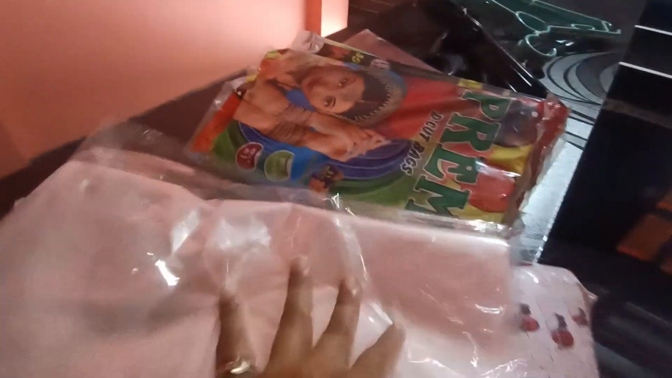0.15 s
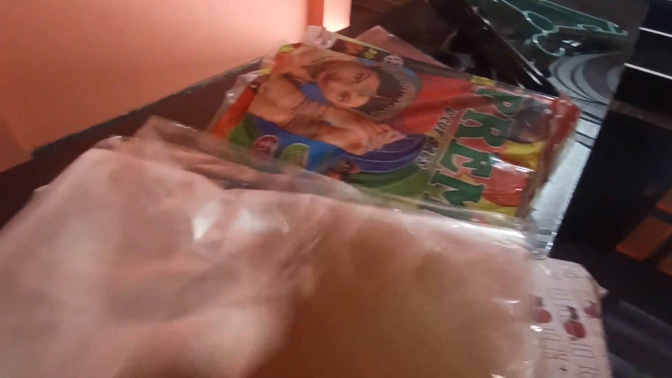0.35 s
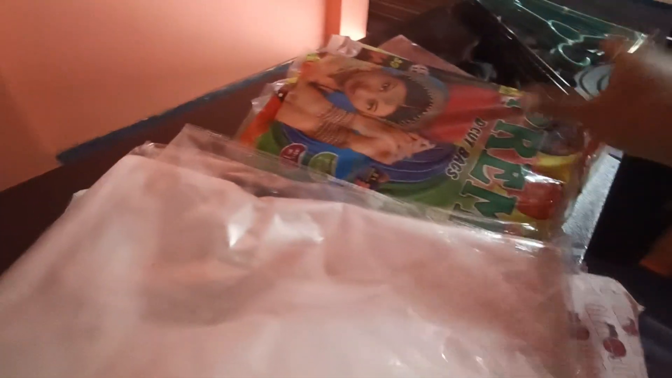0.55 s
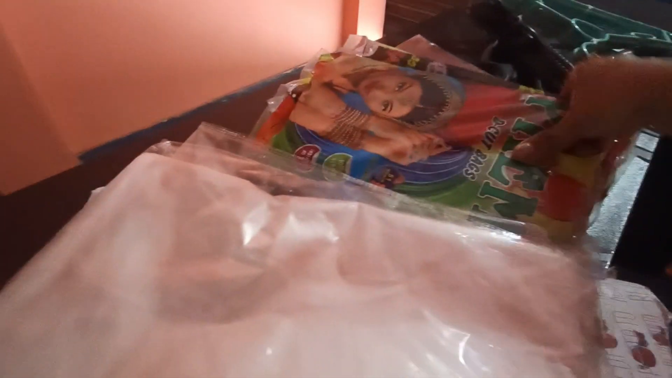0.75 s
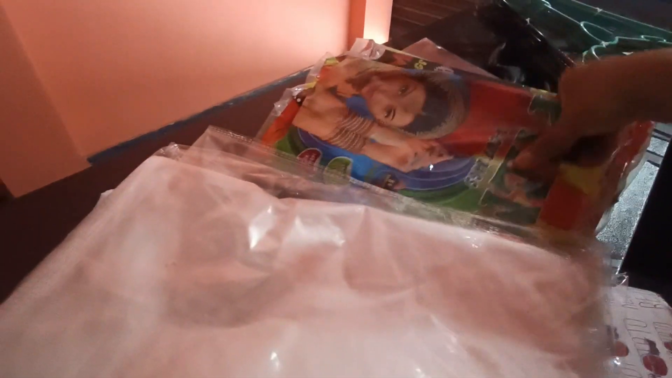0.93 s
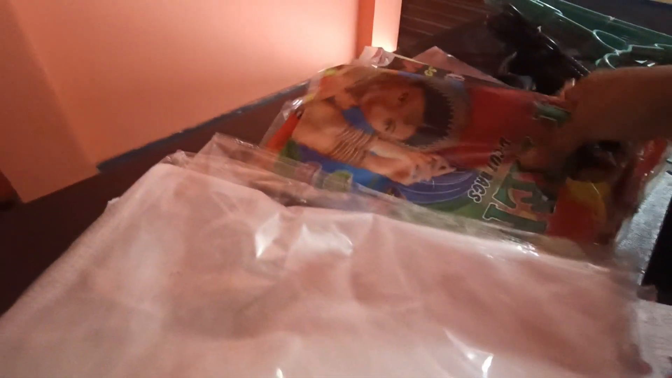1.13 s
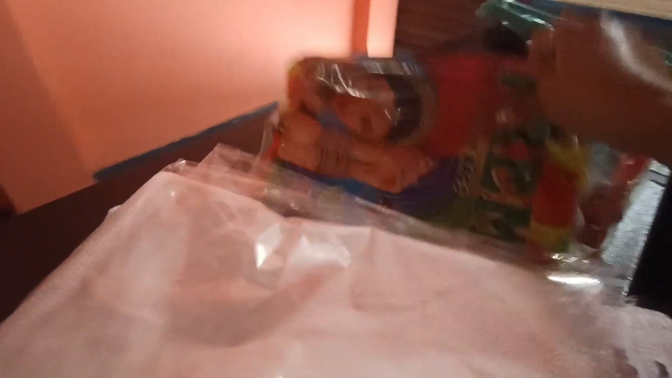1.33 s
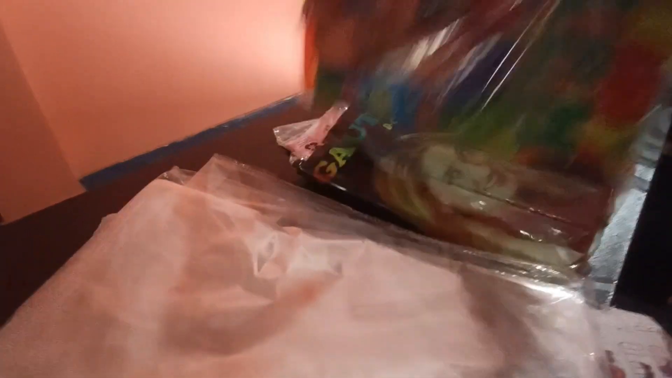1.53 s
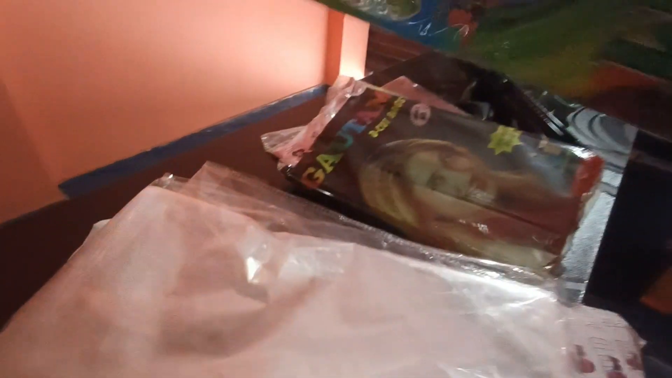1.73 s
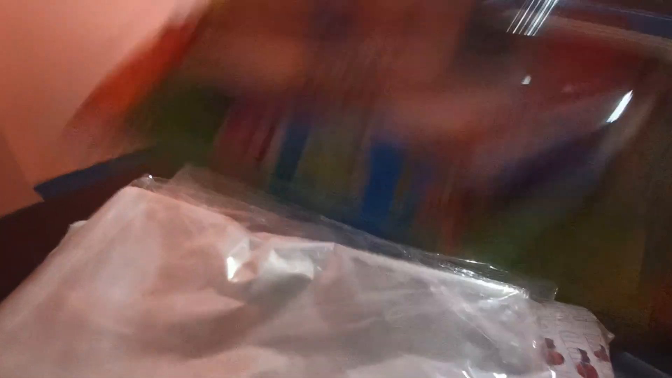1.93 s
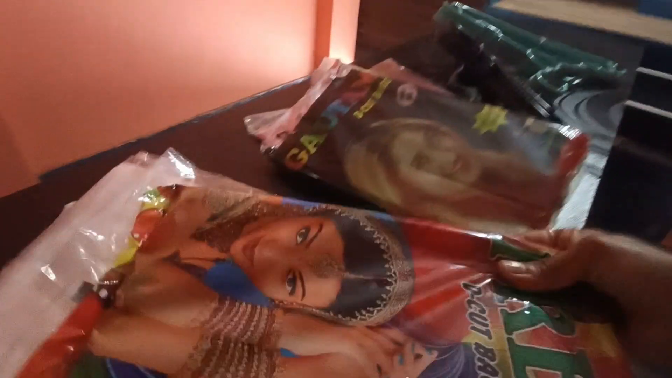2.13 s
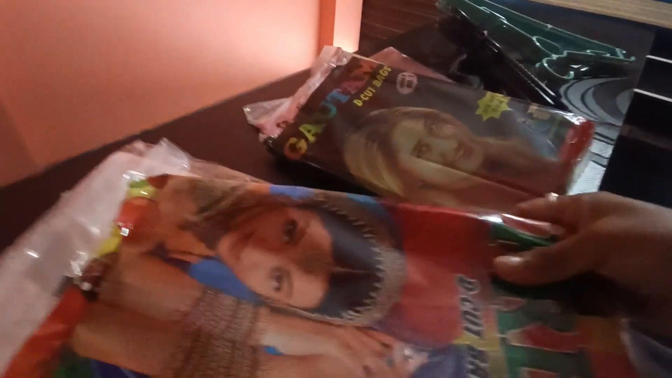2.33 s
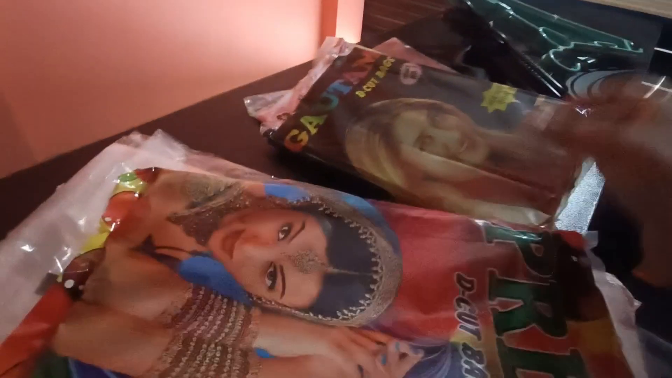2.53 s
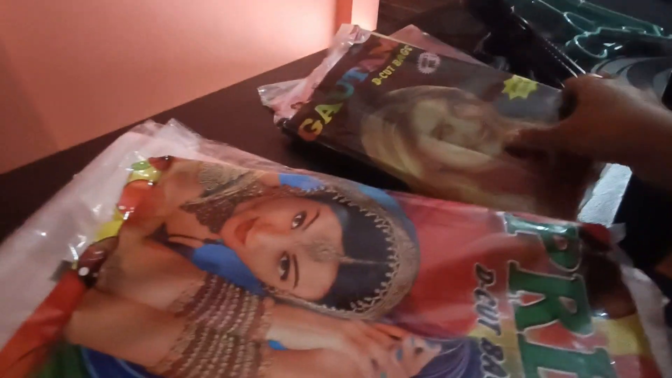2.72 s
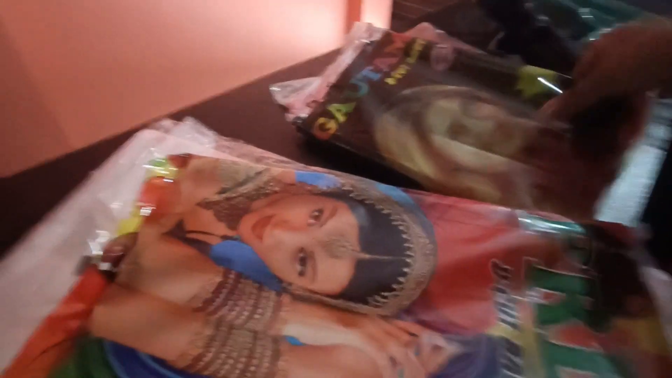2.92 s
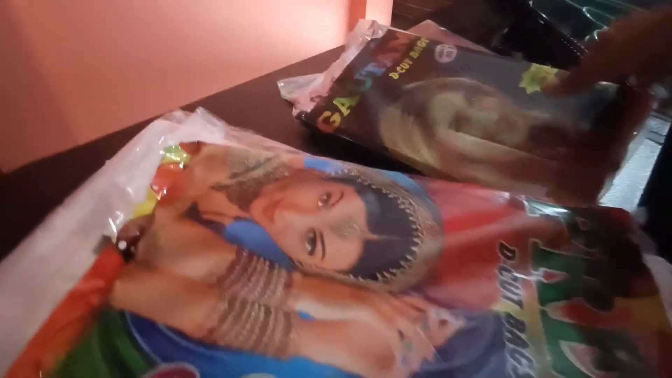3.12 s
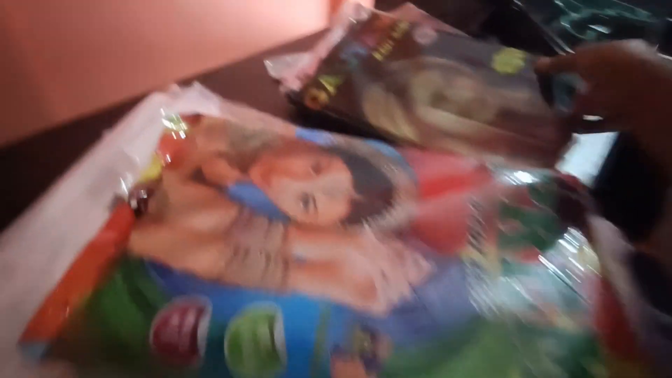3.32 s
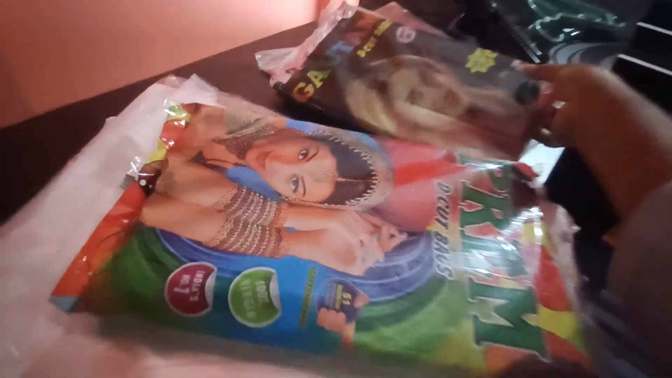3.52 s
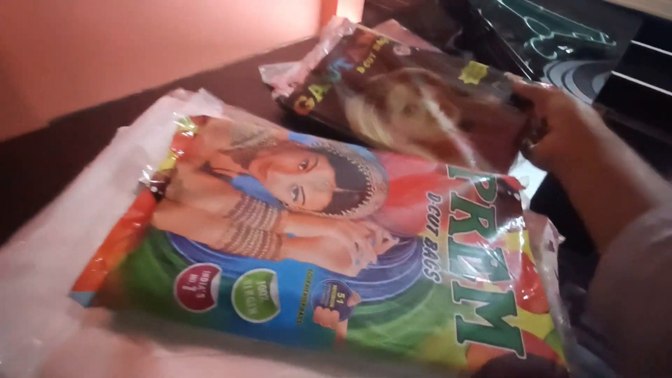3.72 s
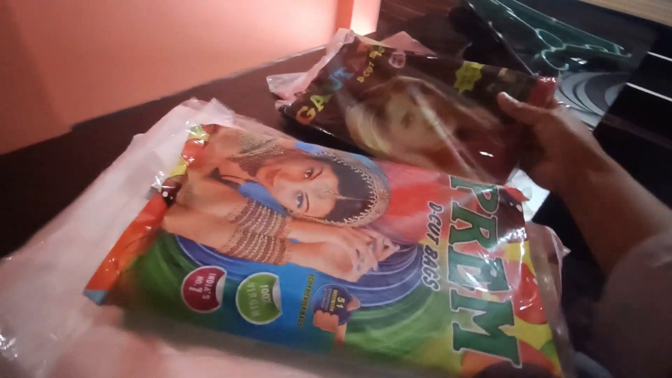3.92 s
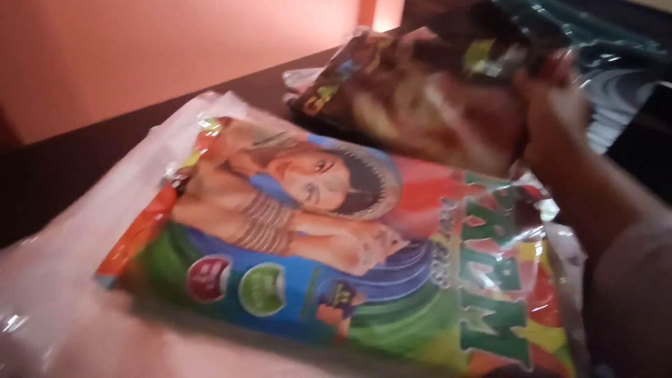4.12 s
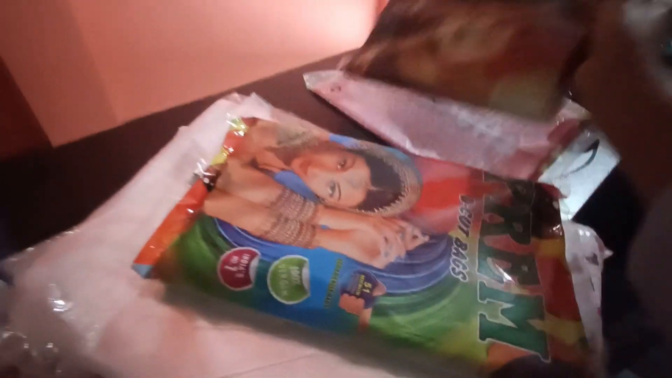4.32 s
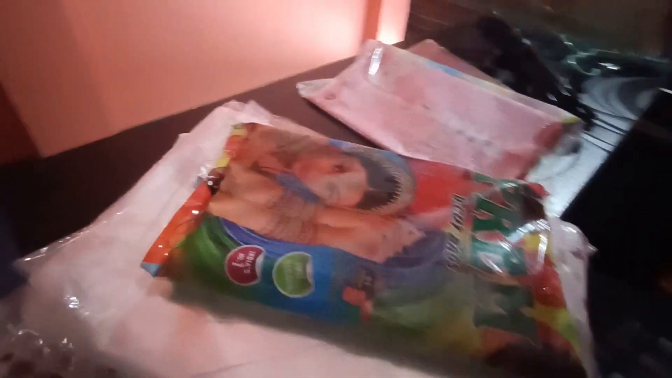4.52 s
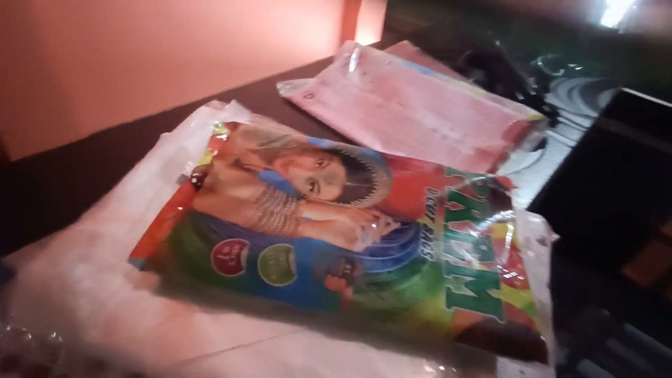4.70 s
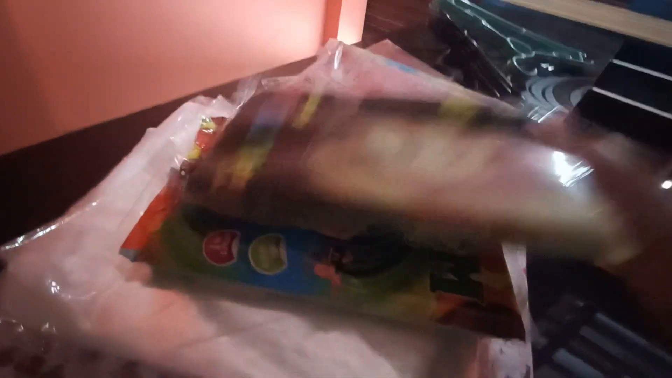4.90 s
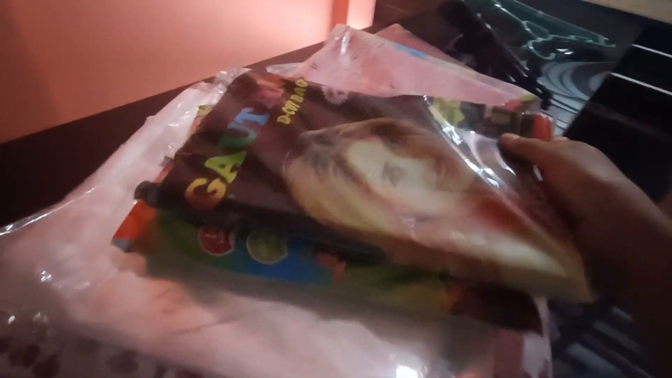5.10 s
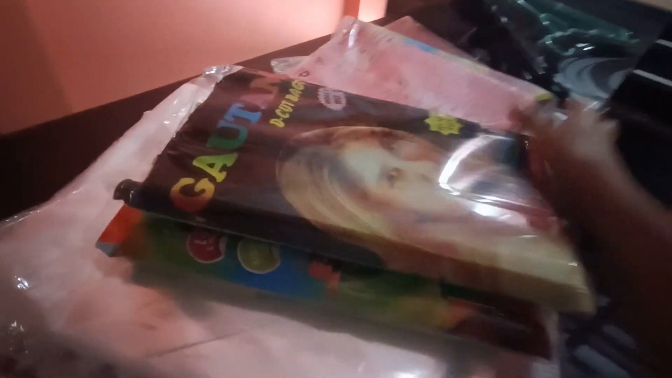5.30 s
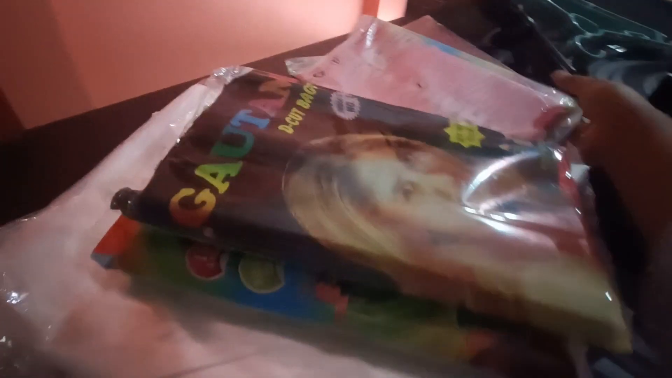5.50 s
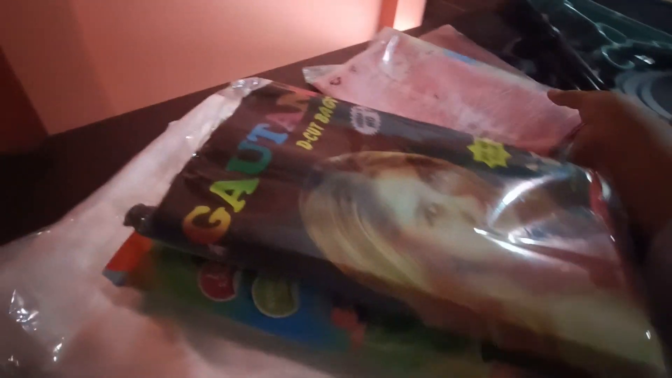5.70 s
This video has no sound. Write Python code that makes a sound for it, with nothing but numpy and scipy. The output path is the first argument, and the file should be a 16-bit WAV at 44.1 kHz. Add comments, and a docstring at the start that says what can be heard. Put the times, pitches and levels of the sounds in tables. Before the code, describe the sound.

Plastic film buckles in countless bright clicks and single ringing snaps as hands pat, grip and lift wrapped packs. One heavy, distorted slap and low thump comes just after two seconds, then lighter crackling, a tap around three seconds, loud cracks past four, and a moderate double landing after five. Hard-walled small room, short bright echo, stereo microphones very near.

```python
"""Stiff film buckling in a bare room

Packs of carry bags in stiff plastic wrap are patted, gripped, lifted and dropped on a table.
The film buckles in countless tiny clicks, made as random decaying noise bursts, and in single ringing snaps,
from faint ticks to loud cracks.
Landing packs slap (dense crackle) and thud (resonant noise and a decaying sine), and push out air.
Decaying noise makes the echo of the room, over a faint hum; two microphones clip on the hardest slaps."""
import sys
import numpy as np
from scipy import signal
from scipy.fft import rfft, irfft, next_fast_len
from scipy.io import wavfile

SR = 44100
rng = np.random.default_rng(int(sys.argv[2]) if len(sys.argv) > 2 else 0)


def store_wav(level_fs):
    """Save 16-bit WAV to argv[1]."""
    pcm = np.round(np.clip(np.atleast_2d(level_fs), -1, 1) * 32767)
    wavfile.write(sys.argv[1], SR, pcm.T.astype(np.int16))


N = 253575

# Levels in the tables are relative within each source, unless stated.
# slow level of the hum: (time [s], level [dB])
HUM_LEVEL = [(0, -44.5), (0.7, -53.5), (2.2, -51), (4.0, -60.5), (5.75, -60)]
# hands or settling packs working the film: (start [s], rise [s], hold [s], effort [dB],
# crispness of the top treble [dB], weight of the sliding stack [dB])
STROKES = [(0.0, 0.00067, 0.031, -23.5, 6, -3.5), (0.213, 0.032, 0.12, -26, 4.5, -3),
           (0.753, 0.011, 0.18, -22.5, -6, -13.5), (0.938, 0.009, 0.011, -20.5, -7, -7),
           (0.992, 0.031, 0.47, -27.5, 6, -7.5), (1.183, 0.093, 0.099, -24.5, -0.5, -4.5),
           (1.364, 0.055, 0.14, -23.5, -2, -0.5), (1.696, 0.042, 0.031, -25.5, -3.5, -6),
           (1.932, 0.044, .01, -33.5, -11, -8), (2.16, 0.026, 0.0063, -13, 0, 3),
           (2.376, 0.16, 0.072, -29, 1.5, 1.5), (2.561, 0.018, 0.0034, -24, 2, -3),
           (2.813, 0.0027, 0.034, -26.5, -8, -8), (2.88, .13, 0.084, -26.5, 1.5, 0),
           (3.117, .02, 0.078, -21, 0, -10), (3.272, .04, .07, -34.5, -14, -6),
           (3.522, 0.0038, .01, -28.5, -8, -4.5), (3.647, .045, 0.031, -27.5, -1, -5.5),
           (3.787, 0.027, 0.26, -29, -5, -7), (3.938, 0.023, 0.036, -25.5, -1, -4),
           (4.062, 0.055, 0.64, -29.5, 3.5, -3.5), (4.354, 0.027, 0.074, -22.5, 6, -10.5),
           (4.58, 0.055, 0.091, -35.5, -5, -14), (5.025, 0.011, 0.26, -19.5, -5, -2.5),
           (5.31, 0.018, 0.095, -23.5, -5, -7.5), (5.621, 0.0091, 0.091, -36.5, -9, 2)]
# single creases snapping over, from faint ticks to loud cracks:
# (time [s], level [dB], ring frequency [Hz], crack level [dB])
CREASE_SNAPS = [(0.192, -18.5, 4250, -4), (0.5906, -28, 3800, -20), (0.7065, -27, 3420, -13),
                (0.7607, -24, 3470, -24), (0.8318, -9, 3330, -24), (0.8739, -10.5, 3230, -30),
                (0.9544, -5, 2870, -22), (1.168, -9, 3370, -5), (1.3066, -11, 3000, -18),
                (1.365, -10, 3840, -24), (1.417, -8, 2880, -21), (1.698, -10, 3770, -31),
                (1.7982, -15, 2860, -13), (1.8039, -10.5, 2870, -11), (1.856, -12.5, 4100, -11),
                (1.9126, -7, 2500, -33), (1.953, -13.5, 2360, -14), (2.0446, -19.5, 4970, -22),
                (2.1415, -21.5, 3210, -7), (2.6029, -4.5, 3040, -15), (2.818, -12, 2960, -18),
                (2.9206, -9, 2970, -22), (2.9753, -11, 2920, -15), (3.027, -13.5, 3060, -11),
                (3.0361, -10, 3050, -11), (3.0748, -8.5, 4200, -21), (3.1167, -5.5, 3300, -25),
                (3.1258, 1, 3430, -26), (3.5252, -15, 3470, -26), (3.6622, -10, 3150, -16),
                (3.799, -13, 3710, -23), (3.8292, -11, 3560, -19), (3.8613, -18, 3440, -16),
                (3.961, -7.5, 3520, -22), (4.1704, -13, 5150, -6), (4.2164, -15, 3520, -19),
                (4.3772, 0, 3460, -19), (4.4048, -2.5, 3540, -15), (4.6434, -12.5, 3190, -21),
                (4.744, -20, 4500, -14), (4.796, -18, 3300, -33), (4.8202, -6.5, 5200, -31),
                (4.9297, -21, 5650, -22), (5.1317, -2, 3100, -17), (5.3404, -1.5, 3140, -33),
                (5.6278, -19, 3480, -24)]
# a palm, a finger or a pack lands:
# (time [s], slap level [dB], thud level [dB], thud frequency [Hz], rise [s], 60 dB fade [s])
LANDINGS = [(0.257, -9, -25.5, 516, 0.0063, 0.13), (0.757, -39, -33.5, 170, 0.0023, 0.12),
            (2.164, -21.5, -34, 250, .002, 0.12), (2.174, -1.5, -4.5, 252, 0.011, 0.11),
            (2.598, -38, -31.5, 285, 0.004, 0.1), (3.122, -12, -23.5, 174, 0.0043, 0.074),
            (3.799, -29, -26, 1390, 0.00032, .02), (5.036, -7, -15.5, 440, 0.014, 0.13),
            (5.35, -10, -16, 330, 0.0019, 0.054)]
# air squeezed from under a pack: (time [s], level [dB], frequency [Hz], length [s])
AIR_PUFFS = [(0.282, -41, 70, .014), (2.218, -21.5, 58, 0.012), (3.628, -45, 58, 0.046),
             (5.152, -25, 69.6, 0.01), (5.315, -37, 45, 0.017)]
# low resonances of table and room: (frequency [Hz], level [dB], 60 dB decay [s])
BOOM_MODES = [(79, -3, 1.1), (108, -1, .7), (160, -8, .5), (250, -5, .7), (282, 0, .7), (371, -10, .7)]
# reverberation of the room: (frequency [Hz], 60 dB decay [s])
ROOM_DECAY = [(100, 0.33), (260, 0.77), (700, 0.69), (1840, 0.75), (4850, 0.84), (9000, 0.46), (15000, 0.5)]
# spectrum of the steady room air: (frequency [Hz], density [dB per Hz])
AIR_SPECTRUM = [(15, -60), (25, -12), (125, 2), (257, -8), (462, -1.5), (655, -21), (1060, -16),
                (1310, -27), (2240, -22), (4150, -36), (15000, -38)]
# spectrum of the buckling film: (frequency [Hz], density [dB per Hz])
FILM_SPECTRUM = [(100, -48), (400, -13.5), (800, -11.5), (1200, -9), (1650, -8), (2300, -3), (3100, 2),
                 (4600, 0), (6400, -6), (7600, -14), (12000, -12), (16000, -22)]
# spectrum of the sliding stack of bags: (frequency [Hz], density [dB per Hz])
STACK_SPECTRUM = [(30, -2), (70, -24), (125, 7.5), (190, -0.5), (400, -1), (700, -5.5), (1200, 0.5),
                  (2200, -11.5), (5000, -93)]
# spectrum of the wrinkle ticks: (frequency [Hz], density [dB per Hz])
TICK_SPECTRUM = [(500, -26), (1500, 7), (3000, -5), (6500, 12), (8000, 2), (15000, -6.5)]
# spectrum of the slapped wrap: (frequency [Hz], density [dB per Hz])
SLAP_SPECTRUM = [(100, 2), (500, -7.5), (800, -12), (1200, -4.5), (1650, -10.5), (3100, -1), (5000, -6.5),
                 (7600, -13.5), (12000, -19.5), (16000, -19)]
# treble difference between the microphones, before each one's share: (frequency [Hz], level [dB])
SHADE = [(1200, 0.67), (2300, 4.8), (8000, 10.3), (13000, 6.5)]

PORT_LAG = 0.000455  # typical lead of the left microphone [s]
TOP_HZ = 16050  # band limit of the recorder [Hz]
SAG_DB_PER_S, RELEASE_DB_PER_S = 21.5, 136  # effort falls slowly while held, fast once let go
REST_DB = -52  # effort of film left alone, which still creeps [dB]
FACET_TILT = 0.2  # dB per octave for each dB of crispness: taut film favours its small, high facets
SNAP_PAN_DB = -4.5  # left minus right [dB]
RANDOM_SNAPS_PER_S, RANDOM_SNAP_DB = 8, 0  # rate and relative level of further creases
RANDOM_SNAP_GROWS = 0.67  # dB per dB of effort
RANDOM_SNAP_HZ, RANDOM_CRACK_DB = 3680, -13  # typical ring [Hz] and relative crack level [dB]
BOOM_DB, BOOM_HZ = -19, 250  # boom over a thud of this pitch; higher thuds stir the table less


def amp(db):
    """Level law: an amplitude gain is ten to the power of dB / 20."""
    return 10 ** (np.asarray(db) / 20)


def unit(x):
    """Normalisation: a signal divided by its root mean square has rms 1."""
    return x / np.sqrt(np.mean(x ** 2) + 1e-20)


def along(points, hz):
    """Logarithmic frequency scale: (Hz, value) points are joined by straight lines on it."""
    f, v = np.transpose(points)
    return np.interp(np.log(hz + 1), np.log(f), v)


def filtered(x, response):
    """Convolution theorem: the spectrum is multiplied by a complex response of frequency."""
    n = x.shape[-1]
    m = next_fast_len(n + SR // 8)
    return irfft(rfft(x, m) * response(np.fft.rfftfreq(m, 1 / SR)), m)[..., :n]


def coloured(x, points, size=4096):
    """Minimum phase: folding the cepstrum gives a causal filter of known spectrum, here of unit energy."""
    log_gain = np.log(amp(along(points, np.fft.rfftfreq(size, 1 / SR))))
    cepstrum = irfft(log_gain)
    cepstrum[1:size // 2] *= 2
    cepstrum[size // 2 + 1:] = 0
    pulse = irfft(np.exp(rfft(cepstrum)))
    pulse = pulse / np.linalg.norm(pulse)
    return signal.fftconvolve(x, pulse[None], axes=1)[:, :x.shape[1]]


def resonance(f, hz, q):
    """Damped oscillator: the response of one mode peaks at its own frequency."""
    damping = 1j * f * hz / q
    return damping / (hz * hz - f * f + damping)


def pair(n, apart):
    """Partial coherence: two microphones share one white noise and each adds its own, of size apart."""
    return unit(rng.standard_normal(n) + apart * rng.standard_normal((2, n)))


def add(track, s, x):
    """Superposition: x is summed into the track from time s [s] on."""
    part = track[:, max(round(s * SR), 0):][:, :x.shape[-1]]
    part += x[..., :part.shape[1]]


def lagged(x, lag):
    """Time of arrival: the sound reaches the left microphone lag seconds before the right."""
    return filtered(x, lambda f: np.exp(1j * np.pi * f * lag * np.array([[1], [-1]])))


def shaded(x):
    """Frequency-dependent level difference: the right microphone hears the treble louder."""
    def response(f):
        shade = along(SHADE, f)
        return amp([-.6 * shade, 0.29 * shade])
    return filtered(x, response)


def background():
    """Filtered noise: a broad spectrum is steady room air, a narrow resonance a wavering hum."""
    hum_times, hum_levels = np.transpose(HUM_LEVEL)
    hum_db = np.interp(np.arange(N) / SR, hum_times, hum_levels)
    hum = unit(filtered(pair(N, apart=0.17), lambda f: resonance(f, 124.9, q=16.5) ** 2))
    air = coloured(pair(N, apart=0.37), AIR_SPECTRUM)
    return amp(-48.5) * air + amp(hum_db) * hum


def handling():
    """Power addition: strokes swell, sag while held and die away; gives effort, crispness, weight [dB]."""
    start, rise, hold, db, crisp_db, weight_db = np.transpose(STROKES)[:, :, None]
    t = np.arange(N) / SR - start
    sag_db = SAG_DB_PER_S * np.clip(t - rise, 0, hold)
    release_db = RELEASE_DB_PER_S * np.maximum(t - rise - hold, 0)
    power = (np.clip(t / rise, 0, 1) * amp(db - sag_db - release_db)) ** 2
    total = power.sum(0) + amp(REST_DB) ** 2
    # stronger strokes count for more in the character of the moment
    return 10 * np.log10(total), (power * crisp_db).sum(0) / total, (power * weight_db).sum(0) / total


def buckles(rate, spread_db, t60, apart=0.98):
    """Shot noise: short white bursts at random times, a few much larger than the rest, at rms 1."""
    size = amp(spread_db * np.minimum(rng.standard_normal(N), 2))
    starts = (rng.random(N) < rate / SR) * size
    power = signal.lfilter([1], [1, -amp(-120 / (t60 * SR))], starts ** 2)
    return unit(np.sqrt(power) * pair(N, apart))


def facets(crisp_db, count=7):
    """Small resonators: facets of different size and place click at their own pitch and moments."""
    clicks, pitches = np.zeros((2, N)), np.geomspace(1800, 8000, count)
    for hz in pitches:
        stream = buckles(rate=150, spread_db=5.5, t60=.003)
        ringing = filtered(stream, lambda f: resonance(f, hz, q=4.5))
        share = amp(FACET_TILT * crisp_db * np.log2(hz / np.median(pitches)))
        clicks += share * lagged(ringing, PORT_LAG * rng.uniform(0.59, 1.115))
    return clicks


def crinkle(effort_db, crisp_db, weight_db):
    """Buckling and friction: film crackles over a finer rustle, and the stack of bags slides dully."""
    rustle = lagged(buckles(rate=1500, spread_db=4, t60=.005), PORT_LAG)
    crackle = unit(coloured(facets(crisp_db), FILM_SPECTRUM))
    film = unit(crackle + .65 * unit(coloured(rustle, FILM_SPECTRUM)))
    top = filtered(film, lambda f: f ** 4 / (f ** 4 + 7000 ** 4))
    film = film + top * (amp(0.49 * crisp_db + 2.5) - 1)
    sliding = buckles(rate=400, spread_db=3.5, t60=0.011, apart=0.42)
    stack = lagged(coloured(sliding, STACK_SPECTRUM), 0.00022)
    # the stack follows the effort less than the film does
    return amp(effort_db - 2.5) * film + amp(0.75 * effort_db + 0.59 * weight_db - 17.5) * stack


def ticks(effort_db, crisp_db):
    """Sparse impulses: small wrinkles tick briefly and brightly, and persist when the hands slow down."""
    sparse = buckles(rate=110, spread_db=4, t60=.003)
    return amp(0.71 * effort_db + 0.48 * crisp_db - 20.0) * coloured(sparse, TICK_SPECTRUM)


def random_snaps(effort_db, count=80):
    """Random yielding: further creases give way, louder under effort; rows as in CREASE_SNAPS."""
    gaps, scatter = rng.uniform(.5, 1.5, count), rng.standard_normal((count, 3))
    times = np.cumsum(gaps) / RANDOM_SNAPS_PER_S
    rows = []
    for s, (a, b, c) in zip(times, scatter):
        if s * SR < N - 1:
            db = RANDOM_SNAP_DB + RANDOM_SNAP_GROWS * effort_db[int(s * SR)] + 2.3 * a
            rows.append((s, db, RANDOM_SNAP_HZ * np.exp(0.17 * b), RANDOM_CRACK_DB + 4 * c))
    return rows


def snaps(effort_db):
    """Snap-through: a crease flips in a run of tiny buckles and rings its facet; near sound, room feed."""
    near, spread = np.zeros((2, 2, N))
    t = np.arange(SR // 40) / SR
    for s, db, hz, crack_db in list(CREASE_SNAPS) + random_snaps(effort_db):
        run = np.exp(-(t / .0019) ** 2) + .13 * amp(-60 * t / .025)
        burst = np.sign(pair(len(t), apart=0.91)) * run
        ring = filtered(burst, lambda f: resonance(f, hz, q=1.6) ** 2)
        body = unit(unit(ring) + 0.74 * unit(coloured(burst, FILM_SPECTRUM)))
        crack = filtered(burst * amp(-60 * t / 0.017), lambda f: f ** 4 / (f ** 4 + 7500 ** 4))
        snap = amp(db - 18.5) * (body + amp(crack_db + 7.5) * unit(crack))
        add(near, s + .0003, snap * amp([[SNAP_PAN_DB / 2], [-SNAP_PAN_DB / 2]]))
        spread[:, round(s * SR)] = np.linalg.norm(snap[0] + snap[1]) / 2
    # summed over all directions, a snap has the even colour of the film
    return near, coloured(spread, FILM_SPECTRUM)


def landings():
    """Impact: the wrap slaps in a dense crackle while the soft pack thuds and sets the table booming."""
    slap, thud = np.zeros((2, 2, N))
    t = np.arange(SR) / SR
    for s, slap_db, thud_db, hz, rise, fade in LANDINGS:
        contact = (1 - np.exp(-t / rise)) * amp(-60 * t / fade)
        crackle = buckles(rate=3000, spread_db=1, t60=0.0042)[:, :len(t)]
        add(slap, s, amp(slap_db) * contact * crackle)
        noise = pair(len(t), apart=0.075)
        push = unit(filtered(noise, lambda f: resonance(f, hz, q=0.91) / (1 + 1j * f / 900)))
        flex = 2.9 * contact * np.sin(2 * np.pi * hz * t)  # the pack flexes for a few cycles
        # contact shapes the flexing twice, so that it starts more softly and fades sooner
        add(thud, s, amp(thud_db) * contact * (1.07 * push + flex))
        boom = sum(amp(db - 60 * t / t60) * np.sin(2 * np.pi * (f * t + rng.random()))
                   for f, db, t60 in BOOM_MODES)
        boom_gain = amp(thud_db + BOOM_DB) * BOOM_HZ / hz
        add(thud, s, boom_gain * boom * (1 - np.exp(-t / 0.0022)))
    return coloured(slap, SLAP_SPECTRUM), thud


def puffs():
    """Displaced volume: a settling pack pushes out one soft swell of air."""
    t = np.arange(N) / SR
    air = np.zeros(N)
    for s, db, hz, length in AIR_PUFFS:
        swell = np.exp(-.5 * ((t - s) / length) ** 2)
        air += amp(db + 1.0) * swell * np.sin(2 * np.pi * hz * (t - s))
    return air


def room(x, count=12):
    """Reverberation: bare walls answer in decaying noise; the tail changes as hands and packs move."""
    out, centres = np.zeros((2, N)), np.linspace(0, N, count)
    for share in np.eye(count):
        hz, t, z = signal.stft(rng.standard_normal((3, SR)), SR, nperseg=256)
        alike = 1 / (1 + (hz[:, None] / 600) ** 4)  # long waves reach both microphones alike
        z = np.sqrt(alike) * z[2] + np.sqrt(1 - alike) * z[:2]
        decay = amp(-60 * t / along(ROOM_DECAY, hz)[:, None]) * (1 - np.exp(-t / 0.0025))
        tail = signal.istft(z * decay, SR, nperseg=256)[1]
        tail = tail / np.linalg.norm(tail[0])
        part = x * np.sqrt(np.interp(np.arange(N), centres, share))  # crossfade between tails
        out += signal.fftconvolve(part, tail, axes=1)[:, :N]
    return out


def scene():
    """Direct and reflected sound: crinkling from one side, broad slaps from ahead, then wall and room."""
    still = background()
    effort_db, crisp_db, weight_db = handling()
    film = shaded(crinkle(effort_db, crisp_db, weight_db))
    wrinkles = shaded(ticks(effort_db, crisp_db))
    snap, snap_spread = snaps(effort_db)
    slap, thud = landings()
    slap = shaded(slap)
    clicks = lagged(snap + wrinkles, 0.000411)
    low = (thud + puffs()) * amp([[.9], [-.9]])  # slightly louder on the left
    near = amp(2) * film + clicks + amp(3.0) * slap + low
    add(near, .0075, amp(-15) * clicks)  # bounce off the wall beside the table
    room_feed = amp(-2.5) * film + amp(-4.5) * slap + amp(-5.5) * shaded(snap_spread) + amp(-6.0) * thud
    return near + room(room_feed) + still


def record(dry):
    """Saturation: the microphone ports ring slightly, full scale clips, and the band is limited."""
    heard = filtered(dry, lambda f: 1 + 0.23 * resonance(f, 3184, q=6.9))
    return filtered(np.clip(heard, -1, 1), lambda f: f < TOP_HZ)


dry = scene()
out = record(dry)
store_wav(out)
```